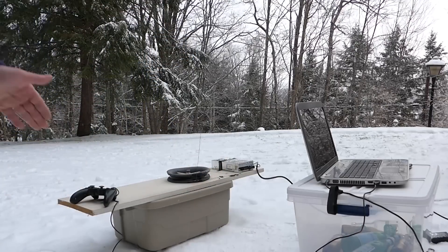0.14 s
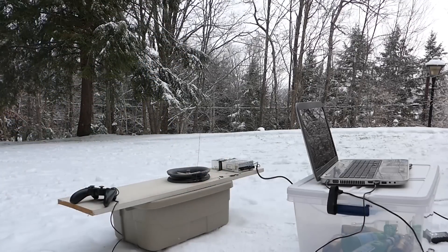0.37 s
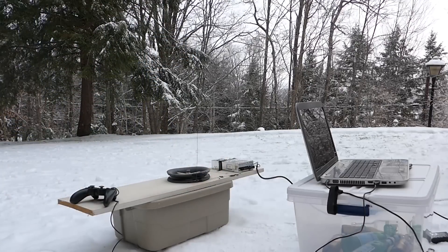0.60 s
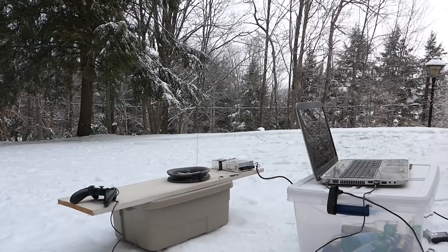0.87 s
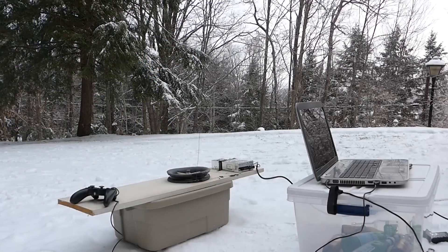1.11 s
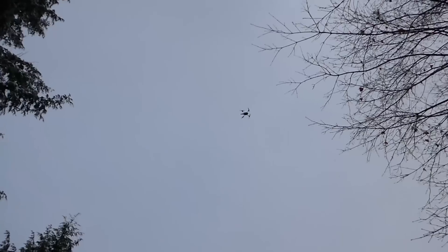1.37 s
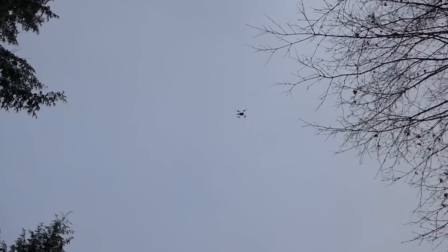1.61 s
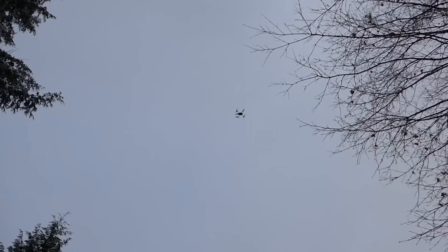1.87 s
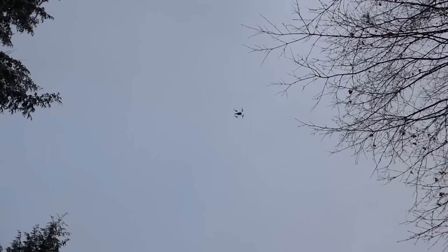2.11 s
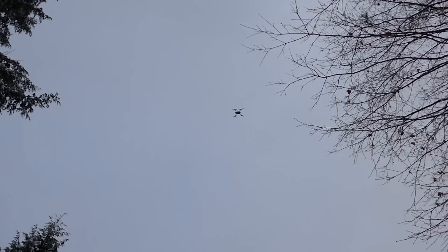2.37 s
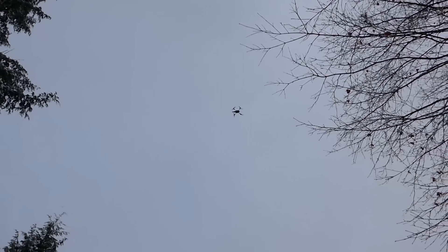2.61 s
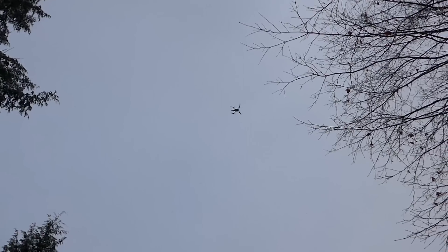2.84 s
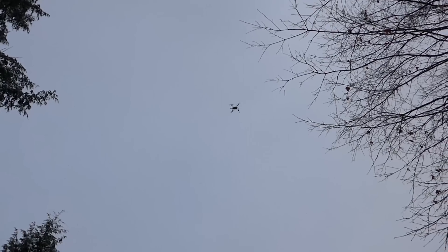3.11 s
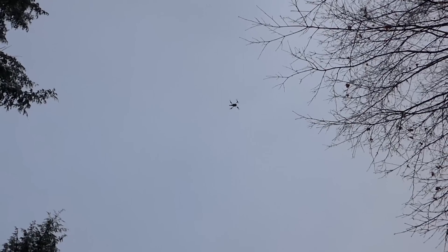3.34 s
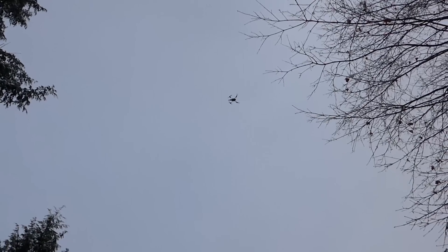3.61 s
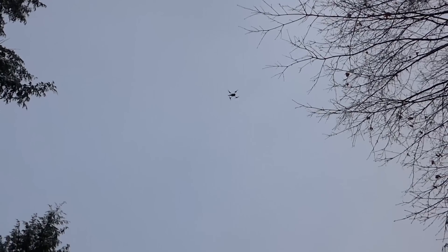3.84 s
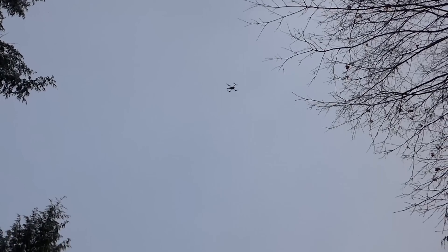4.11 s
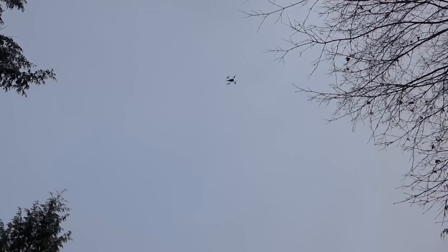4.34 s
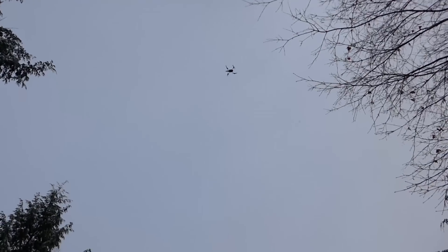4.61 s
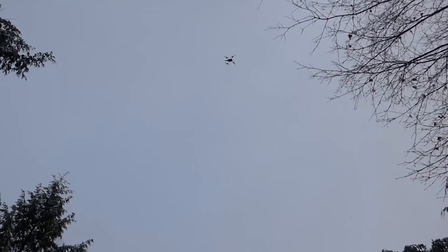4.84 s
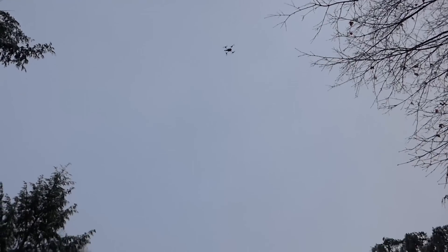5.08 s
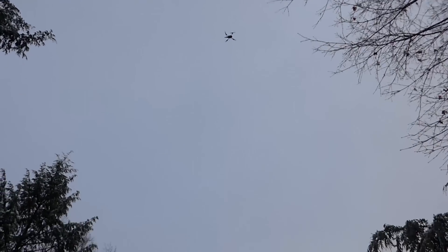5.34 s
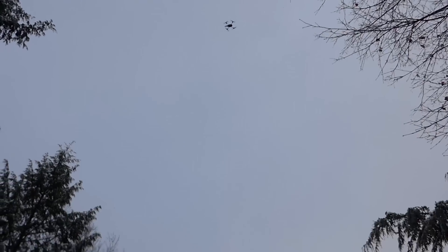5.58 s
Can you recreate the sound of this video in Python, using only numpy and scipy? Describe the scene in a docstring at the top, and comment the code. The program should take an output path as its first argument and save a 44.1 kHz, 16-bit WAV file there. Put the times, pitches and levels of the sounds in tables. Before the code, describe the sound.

Close, hard crunches of boots breaking crusted snow, leaning left in stereo, dominate the first second over a steady thin drone whine and hiss. A clean gap of silence follows. Then the four-rotor craft is heard overhead without footsteps: a rough beating hum, an unsteady motor whine and bright blade hiss, open air with slight scattering from trees, little bass.

```python
"""A small quadcopter hovers some metres above a snowy garden: four rotors at unlike speeds sum shaft harmonics,
a motor whines as magnets pass coils, and turbulent blade tips hiss in time with the turns.
At first, boots beside the microphone crunch the snow: decaying thuds, cracks and showers of grains.
The sound drops out for a quarter second and returns with the craft overhead and no boots."""
import sys
import numpy as np
from scipy import signal
from scipy.fft import rfft, irfft
from scipy.io import wavfile
from scipy.ndimage import uniform_filter1d

SR = 44100
rng = np.random.default_rng(int(sys.argv[2]) if len(sys.argv) > 2 else 0)


def boost_factor(decibels):
    """Convert a level in decibels to a linear amplitude factor."""
    exponent = np.asarray(decibels, float) / 20
    return 10 ** exponent


def file_out(sig):
    """Save sig as 16-bit WAV at sys.argv[1]."""
    # one column per channel
    cols = np.atleast_2d(sig).T
    # limit, then scale
    lim = np.clip(cols, -1, 1)
    pcm = np.round(lim * 32767).astype(np.int16)
    wavfile.write(sys.argv[1], SR, pcm)


N = 251811
TIME = np.arange(N) / SR
BINS = np.maximum(np.arange(N // 2 + 1) * SR / N, 1)  # Hz
CUT_S, RETURN_S = 1.243, 1.513  # the dropout

# motor whine, which also tells the throttle: t/s, nominal f/Hz, nominal level/dB
WHINE = [(0, 4500, -58), (.14, 4610, -53), (.42, 4530, -52), (.55, 4610, -53), (.62, 4790, -52),
         (.86, 4800, -52), (1.15, 4740, -53), (1.24, 4720, -56), (1.52, 4640, -58), (1.75, 4520, -56),
         (2.04, 4690, -55), (2.16, 4560, -52), (2.6, 4570, -56), (2.85, 4550, -53), (3.15, 4500, -51),
         (3.3, 4495, -52), (3.42, 4410, -55), (3.68, 4580, -52), (3.82, 4550, -57), (3.95, 4450, -54),
         (4.15, 4565, -50), (4.28, 4545, -53), (4.48, 4465, -50), (4.7, 4630, -54), (5.0, 4600, -60),
         (5.26, 4485, -54), (5.5, 4700, -56), (5.71, 4640, -58)]


def curve(rows):
    """Linear interpolation in time of every column after the first."""
    s, *columns = np.transpose(rows)
    return [np.interp(TIME, s, c) for c in columns]


def over_hz(rows):
    """Interpolation of a (f/Hz, value) table on a logarithmic frequency axis, at every bin."""
    hz, value = np.transpose(rows)
    return np.interp(np.log(BINS), np.log(np.maximum(hz, 1)), value)


def phase(hz):
    """Phase in radians as the time integral of frequency."""
    return 2 * np.pi * np.cumsum(hz) / SR


def colour(x, rows):
    """Minimum-phase filtering to a given spectrum, brought to rms 1."""
    cepstrum = irfft(np.log(boost_factor(over_hz(rows))), N)
    # folding makes the filter causal: every click rings after itself, not before
    cepstrum *= np.r_[1, np.full(N // 2, 2), np.zeros(N - N // 2 - 1)]
    y = irfft(rfft(x) * np.exp(rfft(cepstrum)), N)
    return y / y.std()


def walk(rate):
    """Low-pass random process: levels held 1 / rate s and slewed twice, with a spread near 1."""
    k = max(int(SR / rate), 2)
    held = np.repeat(rng.standard_normal(N // k + 1), k)
    return 1.265 * uniform_filter1d(uniform_filter1d(held, k), k)[:N]


def grains(scatter_db, share):
    """Sparse impulsive noise: a share of the samples are clicks of very unequal size."""
    clicks = rng.standard_normal(N) * (rng.random(N) < share)
    return clicks * boost_factor(scatter_db * rng.standard_normal(N))


def ports(x, balance, scatter_db):
    """Level and phase differences between two ports, plus scattering as an antiphase noise tail."""
    # phase lead of the left port: f/Hz, phase/rad
    port_phase = [(500, 0), (1250, .8), (1900, .15), (4000, 0)]
    # sound scattered off trees and ground, before scatter_db: f/Hz, level/dB
    scatter = [(60, -9.5), (110, -8.5), (200, -18), (380, -21.5), (700, -17), (1290, -4), (2380, -11.5),
               (4400, -12.5), (8120, -22), (15000, -14.5)]
    half = boost_factor(over_hz(balance) / 2) * np.exp(.5j * over_hz(port_phase))
    tail = rng.standard_normal(N) * np.exp(-TIME / 0.046)
    tail = tail / np.sqrt(np.sum(tail ** 2))
    side = rfft(tail) * boost_factor(over_hz(scatter) + scatter_db)
    return irfft(rfft(x) * np.array([half + side, 1 / half - side]), N)


def preamplifier_rumble(shape):
    """Low-pass electronic noise, independent in each preamplifier."""
    return boost_factor(-54.5) * uniform_filter1d(rng.standard_normal(shape), size=300)


def powder():
    """Granular friction: loose snow sliding off a boot gives short bright rustles that decay exponentially."""
    # slides of powder: start t/s, held t/s, level/dB
    rustles = [(.424, .012, -36), (0.439, .004, -37), (.448, 0.013, -38.5), (1.089, .05, -43),
               (1.1743, 0.00096, -39)]
    # relative spectrum of the powder: f/Hz, level/dB per Hz
    rustle_spectrum = [(1500, -10), (3500, -2.5), (7000, 0), (9500, -1.5), (13000, -1.5), (15500, -3)]
    release_s = 0.0022
    gain = 0
    for start, held, db in rustles:
        decay = np.exp(-np.maximum(TIME - start - held, 0) / release_s)
        gain = gain + boost_factor(db) * (TIME > start) * decay
    return gain * colour(grains(2.2, 0.17), rustle_spectrum)


def crust():
    """Brittle fracture: each break is a damped thud falling in pitch behind a short noise crack."""
    # breaks of the snow crust: t/s, nominal peak level/dB, nominal f/Hz, crack level under the peak/dB
    cracks = [(0.2492, -26, 635, -23.5), (0.2605, -11.5, 820, -20), (0.2685, -19.5, 640, -16),
              (0.2753, -20, 351, -13), (0.334, -25, 740, -7.5), (0.3457, -3, 516, -15.5),
              (0.352, -7, 465, -27), (0.3706, -22, 874, -17.5), (0.3784, -17, 417, -17),
              (0.3887, -23, 530, -18), (0.3963, -26, 444, 2), (0.4279, -23, 820, -4),
              (0.4308, -19, 728, -7), (0.4339, -20, 700, -6.5), (0.4372, -27.5, 592, -11.5),
              (0.4515, -23.5, 687, -9), (0.4549, -22.5, 690, -10.5), (0.5216, -26, 620, -13),
              (0.5536, -23.5, 685, -18), (0.6267, -10.5, 696, -12), (0.6587, -15.5, 904, -2),
              (0.6826, -11, 534, -12.5), (0.69, -27.5, 662, -14.5), (0.696, -21, 686, -10.5),
              (0.7044, -23, 675, -16), (0.711, -28, 868.7, -7), (0.722, -9.5, 793, -14.5),
              (0.729, -18, 516, -9), (0.742, -11.5, 557, -12.5), (0.7584, -16, 670, -8),
              (0.767, -17, 810, -13.5), (0.777, -16.5, 551, -27), (0.8372, -22.5, 650, -12),
              (0.841, -20, 970, -13.5), (0.8498, -20.5, 800, -9.5), (0.8583, -20, 700, -14),
              (1.0893, -22, 519, -8), (1.0922, -22, 420, -15), (1.0952, -23, 370, -12),
              (1.1095, -25, 340, -12), (1.1148, -22, 320, -16), (1.1198, -23, 290, -18),
              (1.1250, -17.5, 720, -12), (1.1286, -20, 380, -17), (1.137, -30, 260, -16),
              (1.1474, -20, 1050, -14), (1.1975, -31, 720, -14)]
    thud_cycles, lean = 1.1, 1.5  # lean in radians: the snow pulls before it pushes
    lead_in = 300  # samples ahead of each break
    out = np.zeros(N)
    t = np.arange(-lead_in, 900) / SR
    chance = rng.standard_normal((len(cracks), len(t)))
    for (s, db, hz, crack_db), noise in zip(cracks, chance):
        rise = thud_cycles / hz / 2
        u = np.maximum(t / rise + 1, 0)  # 0 at onset, 1 at the peak of the thud
        bent_time = t - 0.14 * t * t / rise / (1 + 0.32 * u)
        thud = (u * np.exp(1 - u)) ** 2.0 * np.cos(2 * np.pi * hz * bent_time - lean)
        # the packed snow rings on a little
        ring = np.minimum(u, 1) * np.exp(-u * rise / 0.0046)
        thud += 0.22 * ring * np.sin(2 * np.pi * 0.9 * hz * t)
        crack = np.diff(noise, prepend=0) * (u > 0) * np.exp(-u * rise / 0.0009)
        crack = uniform_filter1d(uniform_filter1d(crack, size=8), size=5) * 5.6
        i = int(s * SR) - lead_in
        out[i:i + len(t)] += boost_factor(db) * (thud + boost_factor(crack_db) * crack)
    return out


def packing():
    """Granular compaction: dull and bright grains click while weight presses the snow, then settle."""
    # weight on the snow: start t/s, held t/s, dull grains' nominal level/dB, bright grains under them/dB
    presses = [(0, 0.022, -45, -6), (.128, 0.0036, -43, -21.5), (0.243, 0.0085, -36.5, -9),
               (0.259, 0.017, -34.5, -8), (.29, 0.018, -40.5, -4), (.313, 0.033, -34, -13),
               (.345, 0.047, -27, -15.5), (0.421, 0.029, -40.5, -8.5), (.517, 0.0061, -36, -15),
               (0.552, 0.0032, -38.5, -8), (.572, 0.0045, -37.5, -7), (.593, .005, -40, -3),
               (0.614, 0.0055, -36, -12), (.63, 0.043, -43, -17.5), (0.678, 0.035, -28.5, -11),
               (0.72, 0.02, -26.5, -13), (0.751, 0.033, -30, -14), (0.818, 0.046, -36, -11),
               (0.916, 0.032, -42, -11), (1.088, 0.038, -33.5, -6.5), (1.139, 0.013, -36.5, -3.5),
               (1.19, 0.044, -44.5, -4.5)]
    # relative spectrum of the dull grains: f/Hz, level/dB per Hz
    dull_spectrum = [(35, -58), (60, -21.5), (216, -2), (367, 0.5), (463, -4), (620, -1.5), (1110, -8),
                     (1400, -12), (2500, -32), (3250, -52.5), (5500, -120)]
    # relative spectrum of the bright grains: f/Hz, level/dB per Hz
    bright_spectrum = [(900, -4), (1500, 1.5), (2800, -2.5), (5000, -6.5), (7000, -6.5), (9000, -10.5),
                       (15000, -18.5)]
    attack_s, release_s = 0.0012, 0.011
    dull_gain, bright_gain = boost_factor(-52.5), 0  # dull settling goes on between presses
    for start, held, db, bright_db in presses:
        attack = np.clip((TIME - start) / attack_s, 0, 1)
        weight = attack * np.exp(-np.maximum(TIME - start - held, 0) / release_s)
        dull_gain = dull_gain + boost_factor(db) * weight
        bright_gain = bright_gain + boost_factor(db + bright_db) * weight
    push = boost_factor(1.5 * walk(120))
    dull = colour(grains(2.2, .06), dull_spectrum) * dull_gain
    bright = colour(grains(1.4, 0.11), bright_spectrum) * bright_gain
    return (TIME < CUT_S) * push * (dull + bright)


def wash(thrust_db):
    """Turbulent flow noise: a low wash of random level that follows the thrust dB for dB."""
    # relative spectrum of the wash: f/Hz, level/dB per Hz
    wash_spectrum = [(18, -66.5), (30, -20), (115, -29), (165, -6.5), (200, -10), (238, -0.5), (298, -6.5),
                     (352, -4), (500, 0.5), (660, -4), (920, -2), (1430, -11.5), (2500, -14.5),
                     (3250, -27.5), (5500, -120)]
    noise = rng.standard_normal(N) * boost_factor(0.8 * walk(40))
    return boost_factor(-52.5 + thrust_db) * colour(noise, wash_spectrum)


def tip_hiss(beat, thrust_db):
    """Amplitude-modulated broadband noise: the blade-tip hiss pulses with the rotor turns."""
    # relative spectrum of the hiss: f/Hz, level/dB per Hz
    hiss_spectrum = [(710, -34.5), (1200, -13), (1520, -13), (2240, -8), (3090, -12), (3470, -8.5),
                     (3910, -8), (4540, -2.5), (4950, -5), (6610, -9.5), (7440, -10.5), (9220, -4.5),
                     (11400, -8.5), (12700, -5), (15600, -11)]
    follows = 0.33  # dB per dB of thrust
    noise = rng.standard_normal(N) * boost_factor(0.39 * beat + 0.4 * walk(25.05))
    return boost_factor(-41 + follows * thrust_db) * colour(noise, hiss_spectrum)


def shimmer():
    """Quadrature-modulated noise bands: parts of the tip hiss swell and slide as the craft tilts."""
    # one table for each band: t/s, centre f/Hz, nominal level/dB
    bands = [
        [(0, 9560, -53), (.45, 9420, -52), (.75, 9850, -44), (.92, 9700, -50), (1.05, 9840, -47),
         (1.3, 9590, -47), (1.5, 9200, -56), (2.0, 9340, -53), (2.3, 9010, -65), (3.2, 9050, -70),
         (3.6, 8920, -60), (4.4, 9030, -62), (4.6, 9210, -51), (5.1, 9200, -63), (5.5, 9250, -52),
         (5.71, 9150, -53)],
        [(0, 12700, -60.5), (1.3, 12880, -51.5), (1.5, 12580, -55), (2.6, 12500, -52.5), (3.2, 12500, -59),
         (3.7, 12420, -60), (4.2, 12480, -48), (4.42, 12200, -59), (4.58, 12470, -50), (5.1, 12450, -60),
         (5.71, 12500, -55)],
        [(0, 13800, -62), (1.3, 13440, -59), (1.5, 13200, -50.5), (2.6, 13100, -48.5), (3.3, 13000, -54),
         (3.65, 13100, -48), (4.0, 13030, -60), (4.42, 13200, -60), (4.6, 13460, -53), (5.0, 13560, -57),
         (5.35, 13730, -50), (5.71, 14240, -49)],
        [(0, 14220, -60), (.5, 14120, -55), (.75, 14430, -47), (.92, 14330, -64), (1.1, 14200, -57.5),
         (1.3, 14300, -64), (1.5, 15000, -50.5), (2.0, 15000, -52.5), (2.3, 14730, -53), (4.4, 15000, -57),
         (4.6, 14800, -52), (5.0, 14900, -57), (5.71, 15030, -53)],
    ]
    rate = 1000  # random levels per second, which sets the bandwidth
    out = 0
    for rows in bands:
        hz, db = curve(rows)
        turn = phase(hz)
        band = walk(rate) * np.sin(turn) + walk(rate) * np.cos(turn)
        out = out + boost_factor(db + 1.5 * walk(10)) * band
    return out


def whine():
    """Electromagnetic excitation: magnets passing coils give a wavering line in a haze of other motors."""
    hz, db = curve(WHINE)
    overhead = TIME >= RETURN_S
    unrest = np.where(overhead, 1, .3)  # overhead, several motors blur the line
    turn = phase(hz * (1 + unrest * (.003 * walk(16) + .0034 * walk(55))))
    second_turn = phase(hz * (1.006 + .007 * walk(10) + .0045 * walk(40)))
    line = boost_factor(db - 1.5 + 2.5 * unrest * walk(25)) * np.sqrt(2.2 - unrest) * np.sin(turn)
    haze = boost_factor(db - 6.5) * unrest * walk(300) * np.sin(turn)
    second_motor = overhead * boost_factor(db - 3 + 3 * walk(16)) * np.sin(second_turn)
    return line + haze + second_motor


def blade_throb():
    """Beating: the first rotor's blade-rate tone interferes with a close neighbour; returns its gain."""
    # weak from the side: t/s, gain before beating/dB, nominal throb f/Hz
    blade_tone = [(1.52, -9, 10), (1.9, -6, 10), (2.2, 0, 10), (3.0, 1, 14), (3.8, -1, 14), (3.9, -2, 3),
                  (4.15, -1, 1.4), (5.71, -3, 2.5)]
    dip_s, neighbour = 4.13, .8  # a moment when the two tones cancel; the neighbour's share
    edge_db, throb_hz = curve(blade_tone)
    slip = phase(throb_hz * (1 + .06 * walk(5)))
    return boost_factor(edge_db) * np.abs(1 - neighbour * np.exp(1j * (slip - slip[int(dip_s * SR)])))


def rotors(thrust_db, flutter_db=2.4, jitter=0.0035):
    """Harmonic series of shaft orders fluttering in gusty inflow; also returns all rotors' once-a-turn beat."""
    # first rotor, with its own speed curve: t/s, nominal shaft f/Hz, hum level/dB,
    # brightness/dB per order above the fourth
    first_rotor = [(0, 126, -63, 2), (.5, 130.1, -56.5, -3), (1.24, 129.8, -59.5, 3.5),
                   (1.52, 133.8, -46, -1.5), (1.9, 129, -65, -0.5), (2.2, 125.4, -52, 0),
                   (2.9, 124.8, -54.5, -0.7), (3.4, 120.5, -54.5, -0.3), (3.7, 125.9, -52, 0),
                   (3.95, 119, -54.5, 1), (4.25, 122.2, -50, -0.2), (4.45, 117.2, -59, 1),
                   (4.65, 122.2, -48, 0.3), (5.1, 121.4, -54.5, 0.2), (5.4, 122.4, -52, 0.5),
                   (5.71, 121.4, -51, -0.5)]
    # other rotors: hover shaft f/Hz, share of throttle followed (0-1), hum level/dB from the side,
    # hum level/dB overhead, both before thrust
    other_rotors = [(115.44, .8, -57.5, -58), (142.7, .8, -58.5, -61.5), (104.2, .5, -54.5, -59.5)]
    # one row for each rotor: relative level/dB of shaft orders 1, 2, 3 ..
    order_levels = [
        [-28.5, -2, -4.5, -3.5, -6.5, -10.5, -9, -12, -10.5, -17.5],
        [-25, -32.5, -8, -17.5, -1, -8.5, -14, -5.5, -13.5, -16],
        [-22.5, -18, -15, -1.5, -15, -6, -15.5, -6.5, -8.5, -13.5],
        [-16.5, -28.5, -13.5, -8.5, 1, -14.5, -6, -19.5, -9.5, -7.5],
    ]
    hover_whine_hz = 4550
    hum_follows = 0.87  # dB per dB of thrust
    throb = blade_throb()
    throttle = curve(WHINE)[0] / hover_whine_hz
    motions = [curve(first_rotor)]
    for hz, follows, side_db, above_db in other_rotors:
        db = np.where(TIME < RETURN_S, side_db, above_db) + hum_follows * thrust_db
        motions.append((hz * throttle ** follows, db, 0))
    hum, beat = 0, 0
    for r, ((hz, db, bright_db), orders) in enumerate(zip(motions, order_levels)):
        turn = phase(hz * (1 + jitter * walk(14)))
        beat = beat + np.cos(turn + 2 * np.pi * rng.random())
        for k, order_db in enumerate(orders, 1):
            # the first rotor's second order is the throbbing blade tone
            gain = throb if (r, k) == (0, 2) else boost_factor(flutter_db * walk(9))
            level = boost_factor(db + order_db + bright_db * max(k - 4, 0))
            hum = hum + gain * level * np.sqrt(2) * np.sin(k * turn + walk(6))
    return hum, beat


def scene():
    """Superposition: craft and boots each reach the two ports with their own balance and scattering."""
    # push of the blades on the air: t/s, level/dB
    thrust = [(0, 3), (.8, 0.5), (1.52, 2.5), (1.9, 3.5), (2.2, 4.5), (3.4, 1), (4.5, 2.5), (4.6, 3),
              (4.78, 2.5), (4.9, 6), (5.02, 3), (5.71, 4.5)]
    # left minus right for the craft: f/Hz, level/dB
    craft_balance = [(200, -0.5), (700, -4), (1290, -3.5), (2380, 2), (8000, -0.5)]
    # left minus right for the boots: f/Hz, level/dB
    boot_balance = [(380, 0.5), (700, -0.5), (1290, 3), (2380, 12.5), (4400, 7), (15000, 9.5)]
    [thrust_db] = curve(thrust)
    hum, beat = rotors(thrust_db)
    craft = hum + whine() + tip_hiss(beat, thrust_db) + shimmer() + wash(thrust_db)
    boots = crust() + packing() + powder()
    return ports(craft, craft_balance, -0.5) + ports(boots, boot_balance, -25.0)


def band_limit(x):
    """A steep low-pass at the top of the band."""
    return signal.sosfilt(signal.butter(12, 16670, fs=SR, output="sos"), x)


def record(dry):
    """Band limiting: the microphone drops bass and very top; a gate cuts the sound and returns it in milliseconds."""
    bass_cut = signal.butter(4, 110, "high", fs=SR, output="sos")
    top_cut = signal.ellip(10, .2, 70, 15600, fs=SR, output="sos")
    heard = signal.sosfilt(top_cut, signal.sosfilt(bass_cut, dry))
    heard = heard + preamplifier_rumble(dry.shape)
    fade_out, fade_in = (CUT_S - TIME) / 0.0026, (TIME - RETURN_S) / 0.0009
    gate = np.clip(np.maximum(fade_out, fade_in), 0, 1)
    return band_limit(heard * gate)


dry = scene()
out = record(dry)
file_out(out)
```